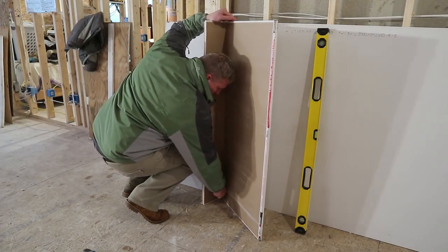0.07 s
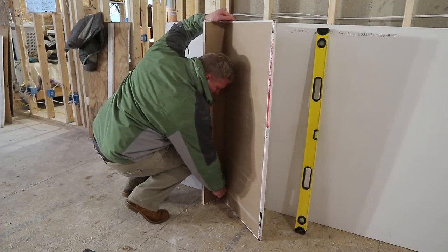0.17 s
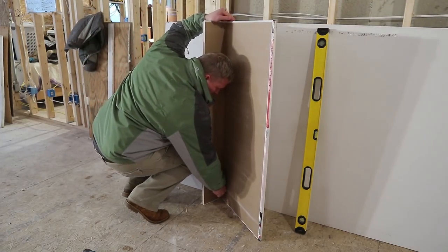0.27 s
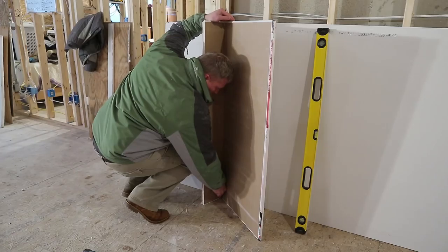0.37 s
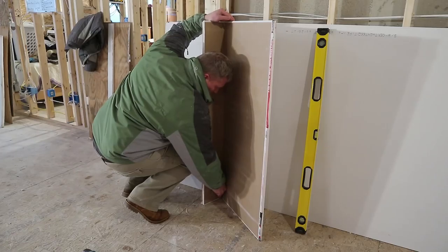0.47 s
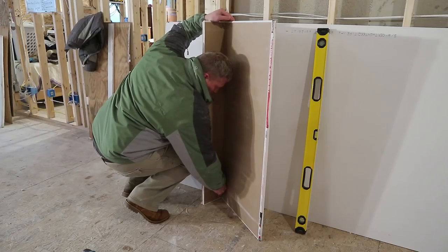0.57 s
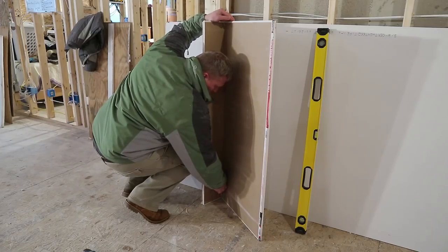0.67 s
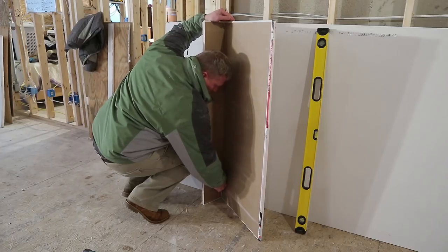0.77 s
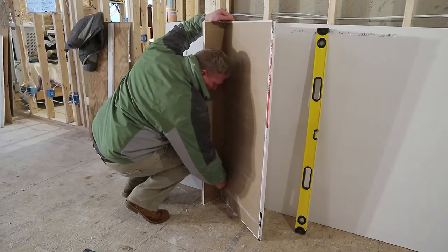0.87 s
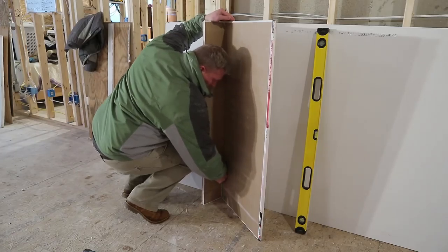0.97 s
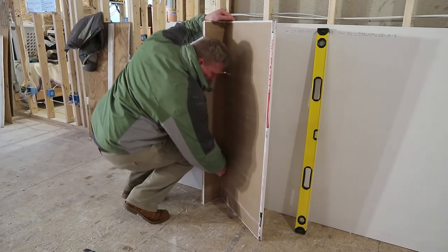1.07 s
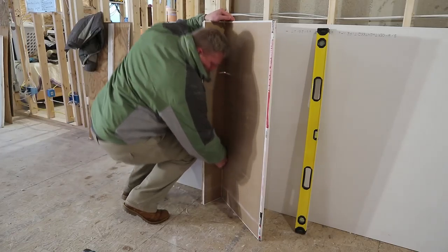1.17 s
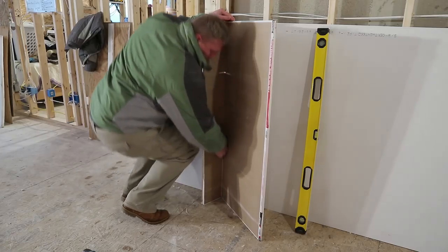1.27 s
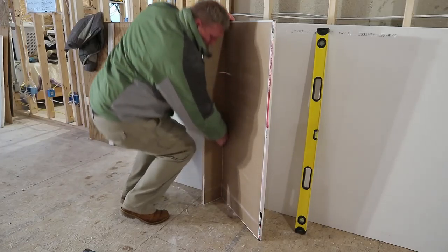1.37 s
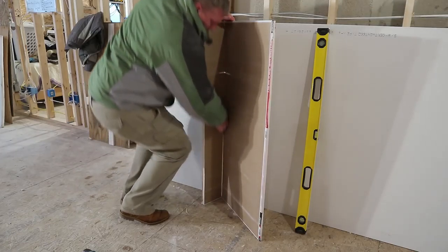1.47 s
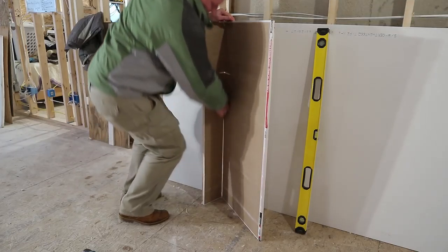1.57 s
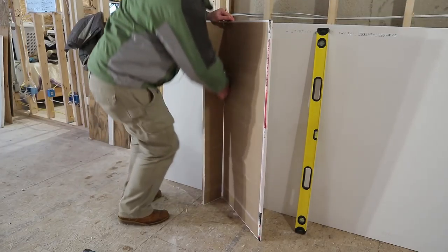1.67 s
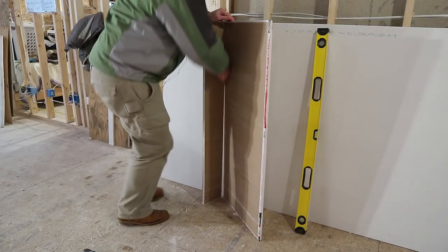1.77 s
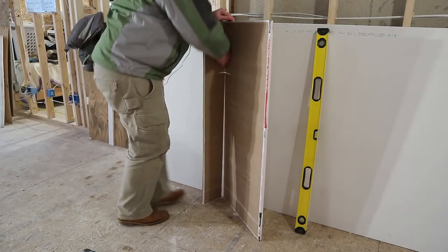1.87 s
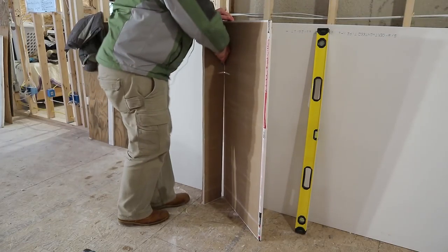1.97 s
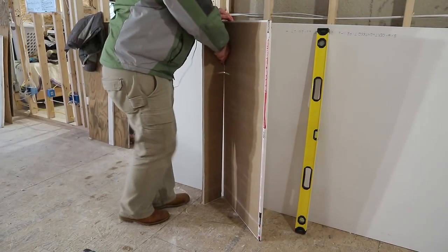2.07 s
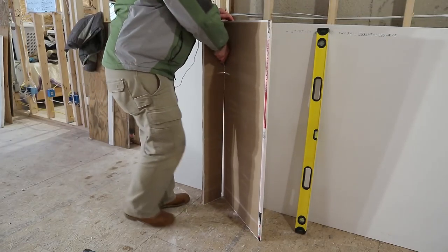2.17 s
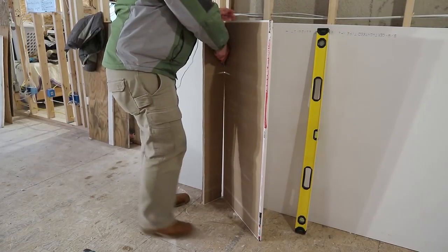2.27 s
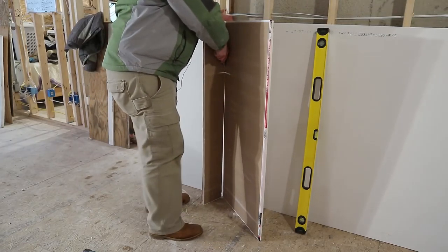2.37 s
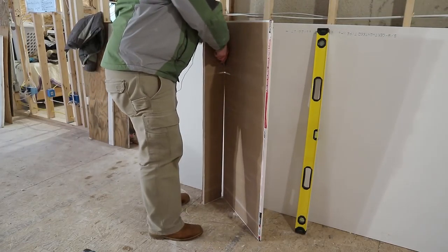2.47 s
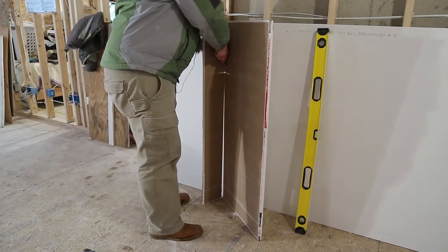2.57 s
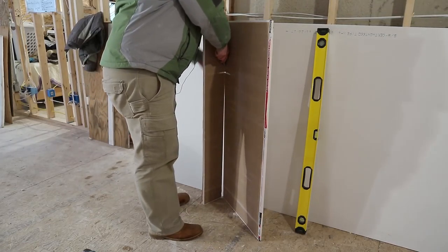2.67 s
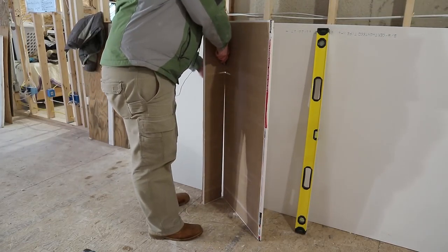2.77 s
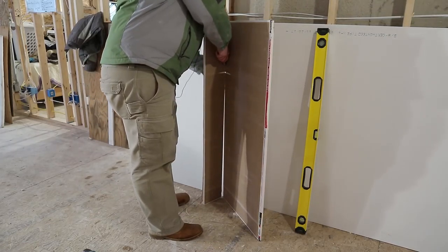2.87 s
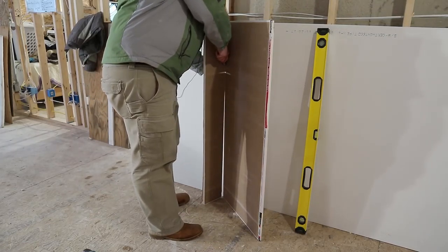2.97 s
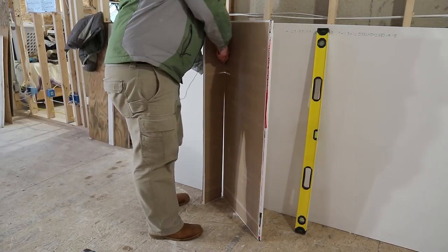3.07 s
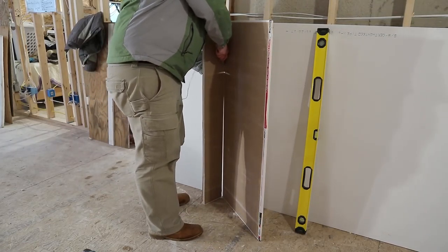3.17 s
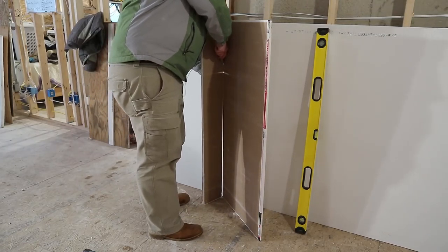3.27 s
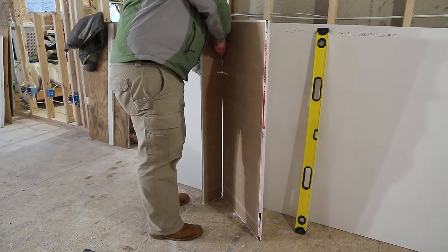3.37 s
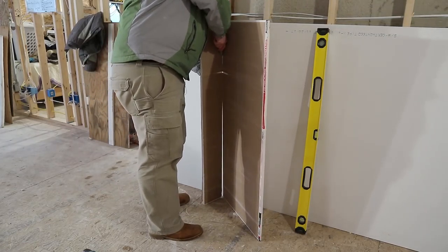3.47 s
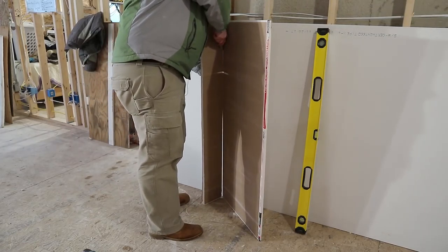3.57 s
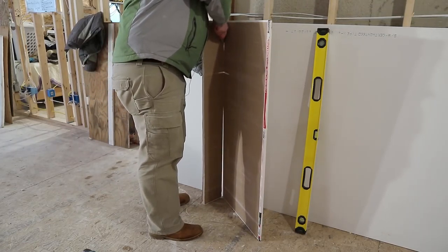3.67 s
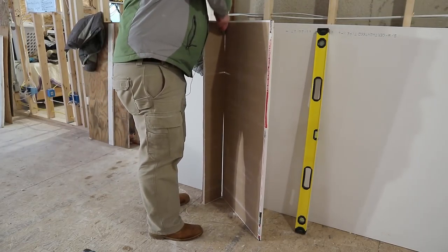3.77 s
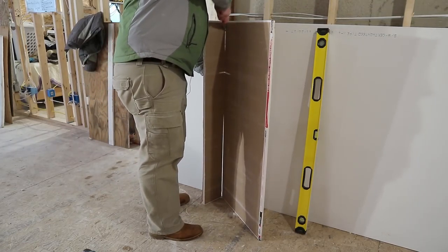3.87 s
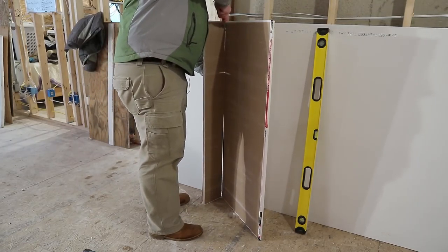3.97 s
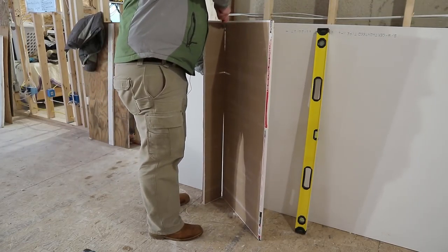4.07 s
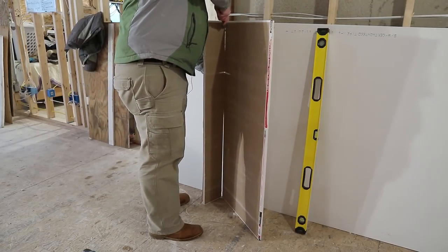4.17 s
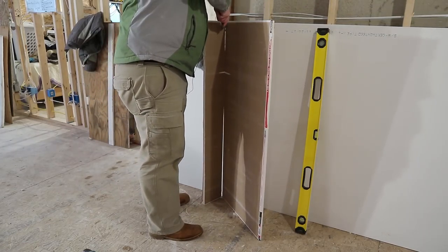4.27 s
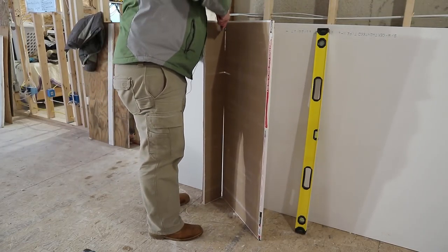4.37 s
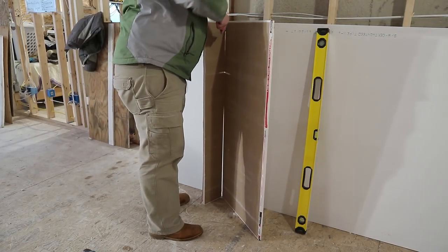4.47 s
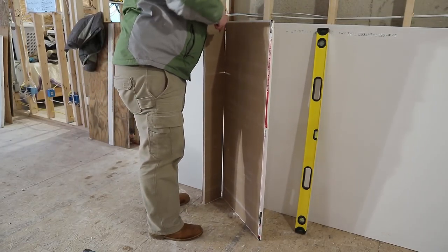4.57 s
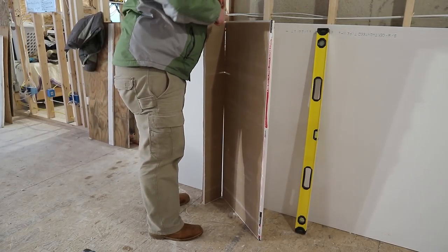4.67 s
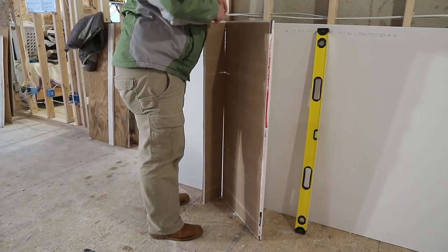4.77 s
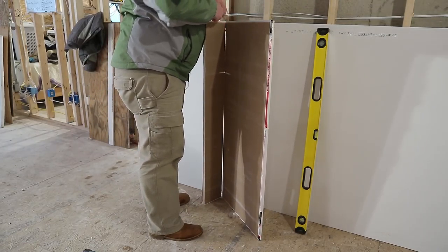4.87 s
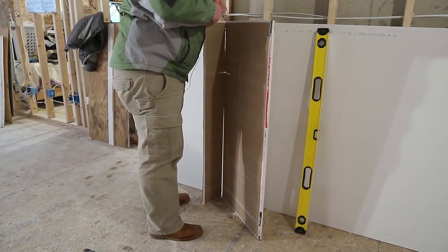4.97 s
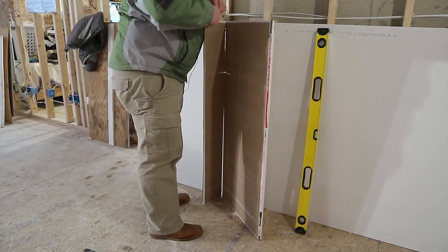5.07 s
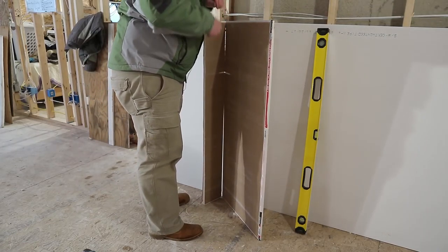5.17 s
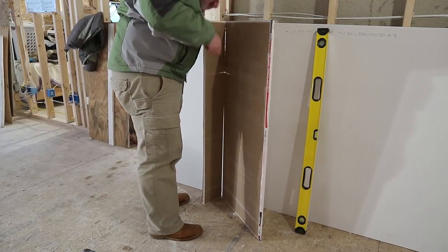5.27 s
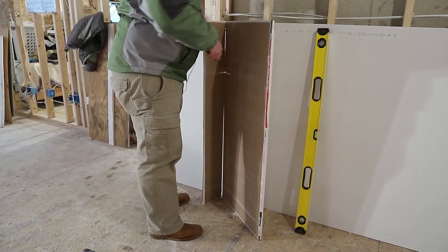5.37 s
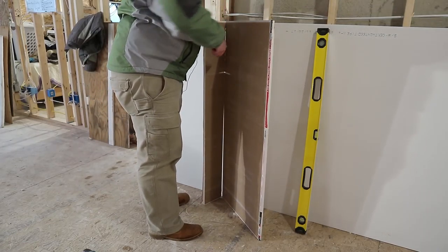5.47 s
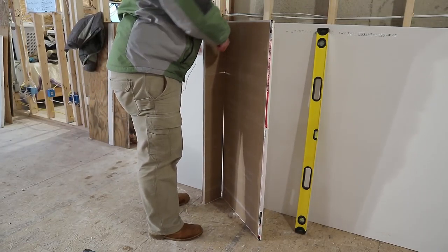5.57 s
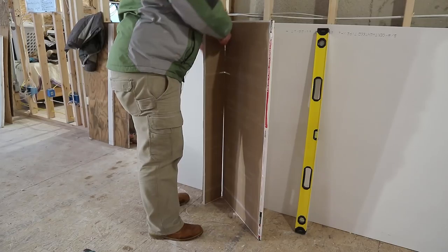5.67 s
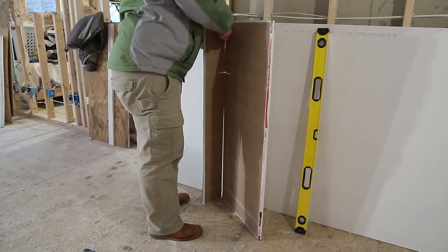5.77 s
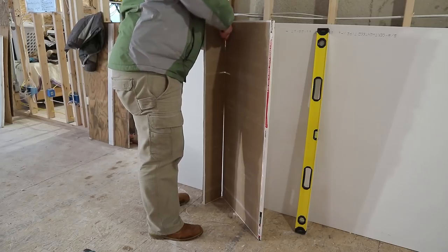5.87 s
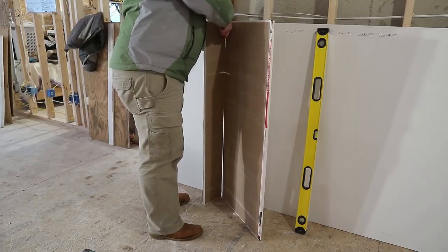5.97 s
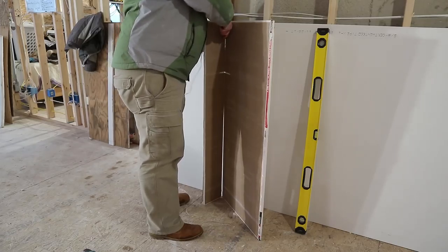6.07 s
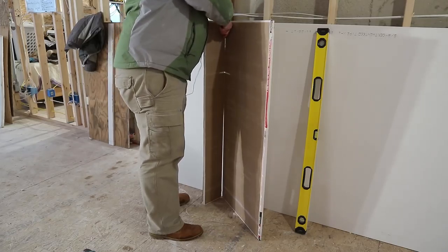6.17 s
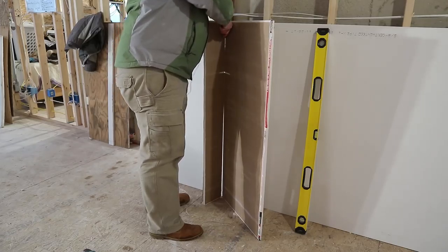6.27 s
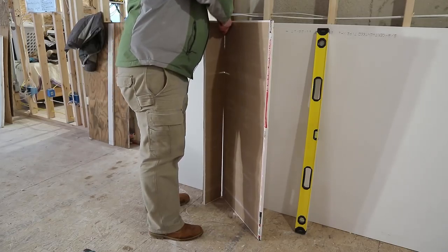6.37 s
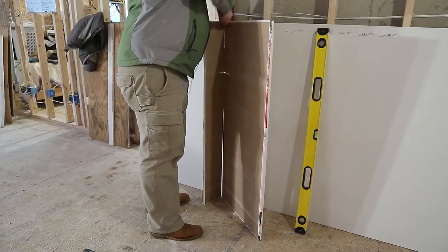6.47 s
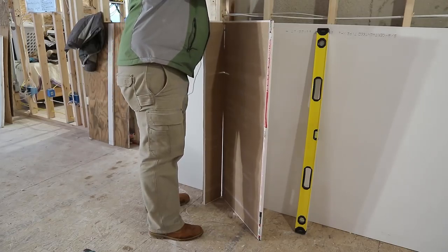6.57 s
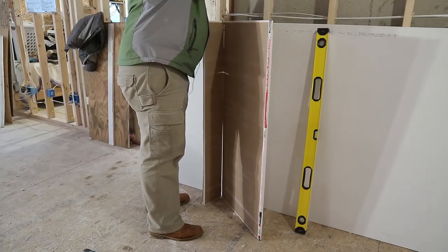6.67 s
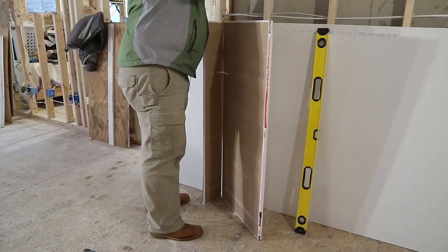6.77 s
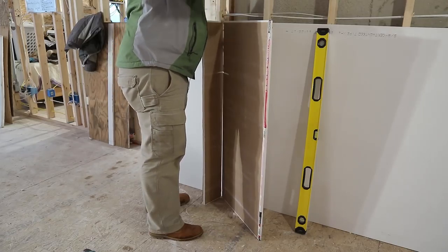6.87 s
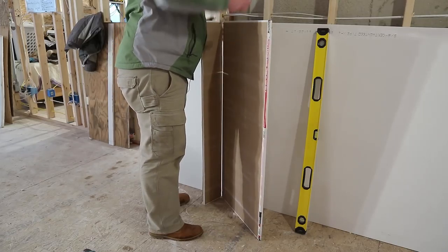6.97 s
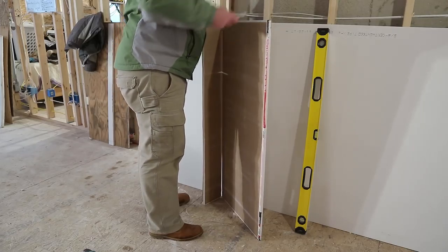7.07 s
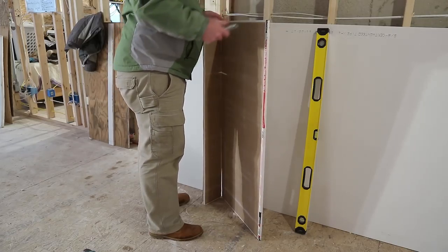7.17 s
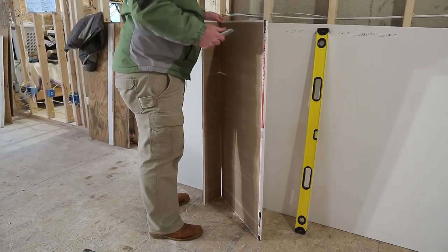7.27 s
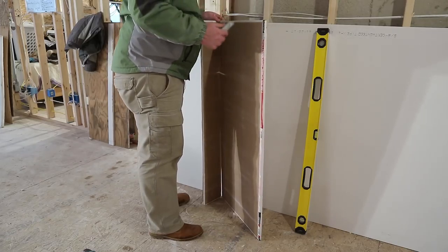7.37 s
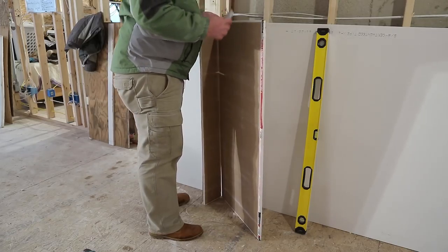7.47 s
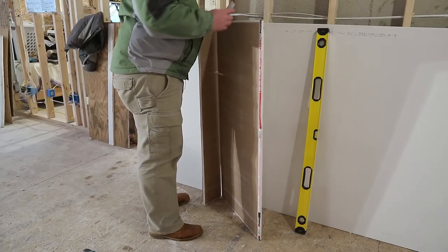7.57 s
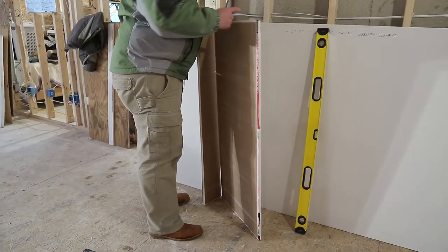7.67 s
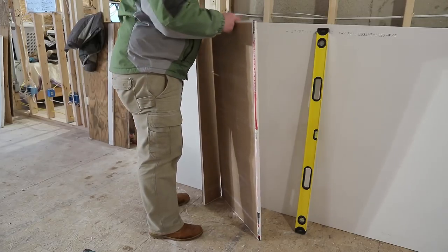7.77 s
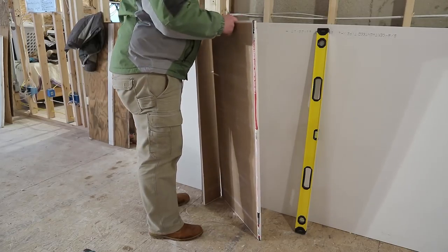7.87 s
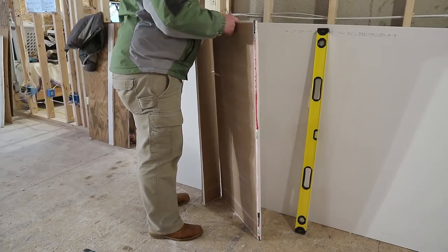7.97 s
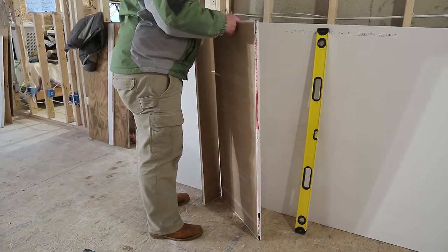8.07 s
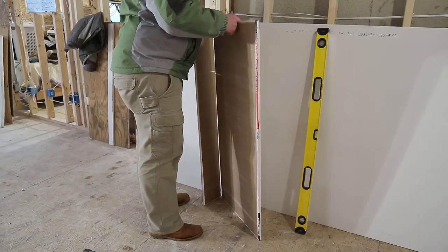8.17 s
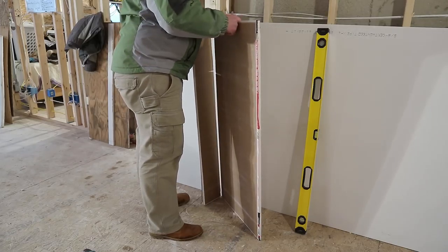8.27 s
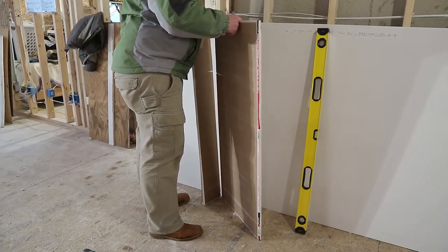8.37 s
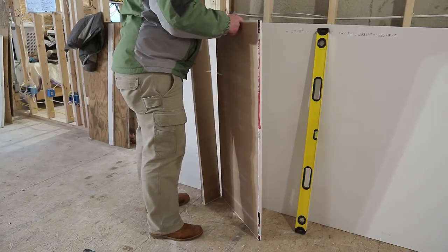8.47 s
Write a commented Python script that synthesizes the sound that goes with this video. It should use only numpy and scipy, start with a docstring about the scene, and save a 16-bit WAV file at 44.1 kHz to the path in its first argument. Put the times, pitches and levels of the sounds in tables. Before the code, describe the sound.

A sharp pop, then a knife rasps through the paper fold of a plasterboard sheet in three strokes, with shuffling, clicks and a final knock.

```python
"""Light shuffling and crackle come first; then a blade pops through the paper fold of a snapped gypsum board.
Three knife strokes follow: random fractures, filtered and scaled by blade speed, give rasp, bite, flex and fizz.
Noise bursts give snaps, prods, a step and bumps; swelling grain trains give the shuffling and jacket swish.
Bursts through metal resonances make the knife clink and its slider click; decaying modes ring the panel and
the cut piece that knocks on the floor. Sparse decaying taps give the bare room, over a steady quiet noise."""
import sys
import numpy as np
from scipy import signal
from scipy.io import wavfile
from scipy.ndimage import map_coordinates

SR = 44100
rng = np.random.default_rng(int(sys.argv[2]) if len(sys.argv) > 2 else 0)


def transcribe(u):
    """Save the signal u as a 16-bit wav file named by the first command-line argument.

    u: samples, shape (n,) or (channels, n), limited to [-1, 1]; the rate is SR.
    q: integer samples, one column per channel.
    """
    v = np.clip(np.atleast_2d(u).T, -1, 1)
    q = np.round(v * 32767).astype(np.int16)
    wavfile.write(sys.argv[1], SR, q)


N = 376173
TIME = np.arange(N) / SR
BINS = np.fft.rfftfreq(8192, 1 / SR)
LEAD_S = 0.05  # a burst peaks this long after its first sample

# Pulls of the blade. Each row: start in seconds, full speed reached in seconds, slowing begins in seconds,
# stop in seconds, exponent of the speeding-up (1 = even), easing before slowing in dB (scaled by each law),
# unevenness of the drag in dB (scales random curves), then levels at full speed, before the layer trims:
# rasp in dB, bite of the edge in dB, flexing of the board in dB, paper fizz in dB, sway of the sheet in dB.
STROKES = [(0.788, 1.633, 1.9, 1.97, 0.97, 1.5, 1.04, -21, -23.5, -35.5, -34, -54.5),
           (3.222, 3.527, 3.89, 4.06, 1.05, 8.4, 1.23, -30.5, -31, -43, -40.5, -53),
           (6.33, 6.509, 6.596, 6.794, 1.52, 12.3, 2.5, -26.5, -28, -43, -41.5, -54.5)]
# How each layer follows a pull: share that sounds even on a creeping blade, power of the blade's speed,
# share of the easing (a negative share grows along the pull).
RASP_LAW = (0.023, 0.95, 0.95)
BITE_LAW = (0.03, 1.16, 0.87)
FLEX_LAW = (0.06, 0.92, -0.37)
FIZZ_LAW = (0.27, 1.78, -0.2)
SWAY_LAW = (0.15, 0.7, -0.75)
# Spectra of the cut, normalised in use. Each row: frequency in Hz, relative density in dB per Hz.
RASP_SPECTRUM = [(250, -31), (400, -11), (510, -4.5), (640, 4), (900, -3), (1180, 1.5), (1600, 0),
                 (2000, -11), (3200, -42)]
BITE_SPECTRUM = [(1100, -31), (1850, -4), (2200, 2), (2650, -2.5), (3000, -4), (3350, -5), (3700, -12.5),
                 (4300, -13), (5500, -18.5), (8000, -31.5), (16000, -52.5)]
FLEX_SPECTRUM = [(60, -33), (130, -8), (190, -8.5), (260, -3.5), (335, 5.5), (400, 0.5), (470, -10),
                 (600, -30), (1500, -53)]
FIZZ_SPECTRUM = [(2000, -60.5), (4000, 4.5), (6200, 3), (8400, 6.5), (9800, -3.5), (13000, -4),
                 (16000, -12.5)]
SWAY_SPECTRUM = [(20, -41.5), (35, -17), (52, -1.5), (65, -2), (82, -2.5), (110, -7), (160, -12),
                 (400, -55)]
# Board resonances under the blade. Each row: frequency in Hz, width in Hz, relative level in dB.
BOARD_RESONANCES = [(739, 30, 4), (1140, 56, -0.5), (1630, 160, 1.5), (1900, 110, -4), (2310, 260, -4.5),
                    (2800, 200, -7.5), (3400, 280, -13), (4700, 950, -20)]
# Chatter on one resonance. Each row: middle in seconds, length in seconds, resonance in Hz,
# level in dB before the rasp trim.
CHATTERS = [(0.053, 0.094, 560, -45), (1.25, 0.81, 604, -33), (1.53, 0.76, 2530, -30),
            (1.73, 0.3, 2140, -30.5), (3.499, 0.33, 1196, -44), (3.72, 0.19, 2250, -40),
            (3.776, 0.29, 230, -41.5), (3.827, 0.39, 4240, -43), (6.152, 0.24, 757, -51),
            (6.506, 0.13, 1175, -37)]
# The released sheet wobbles. Each row: peak in seconds, level in dB, build-up in seconds, decay in seconds.
WOBBLES = [(0.6, -41, 0.015, 0.06), (1.93, -34.5, 0.015, 0.058), (4.0, -45, 0.038, 0.045),
           (4.14, -49.5, 0.026, 0.087)]
# Pops, catches and cracks. Each row: peak in seconds, level in dB, decay in seconds, treble edge in Hz.
SNAPS = [(0.028, -48.5, 0.007, 9000), (0.056, -40.5, 0.0045, 2150), (0.272, -49, 0.0058, 3000),
         (0.505, -43.5, 0.0075, 2500), (0.5683, -10, 0.0041, 3020), (0.5708, -16.5, 0.0014, 15000),
         (1.915, -25, 0.0067, 7900), (2.012, -30.5, 0.012, 4520), (2.227, -38.5, 0.0024, 12100),
         (2.943, -42, 0.011, 3000), (3.796, -30, 0.0076, 6000), (3.904, -25.5, 0.008, 13200),
         (3.985, -31.5, 0.0092, 13000), (5.995, -49, 0.0021, 15000), (6.029, -48, 0.0059, 13000),
         (6.508, -21, 0.0051, 2200), (6.603, -24.5, 0.011, 9950), (6.834, -42.5, 0.0062, 6100),
         (7.892, -40, 0.0049, 13000), (8.078, -49, 0.019, 11000), (8.118, -50, 0.014, 14900)]
# Spectrum of torn paper and grit. Each row: frequency in Hz, relative density in dB per Hz.
PAPER_SPECTRUM = [(25, -41), (100, -16), (500, -3), (1100, -4.5), (2500, -3.5), (3600, -3), (5000, -8.5),
                  (8400, -4.5), (10000, -13), (16000, -11.5)]
# Prods near the top of the fold. Each row: peak in seconds, level in dB, build-up in seconds.
PRODS = [(5.791, -36.5, 0.0012), (5.813, -50, 0.001), (5.927, -46, 0.001), (5.994, -42.5, 0.017),
         (6.078, -35.5, 0.0012), (6.174, -41, 0.008), (6.213, -36.5, 0.016)]
# Panel recoils as the blade enters and leaves. Each row: start in seconds, level in dB.
RECOILS = [(0.5712, -7.5), (1.9, -9.5), (1.907, -9.5)]
# The cut piece lands on its edge and rocks. Each row: start in seconds, level in dB.
LANDINGS = [(7.8915, -19), (7.9355, -33)]
# Modes of panel and piece. Each row: frequency in Hz, relative level in dB,
# time to fall 60 dB in seconds before division by the damping.
PANEL_MODES = [(284, -32.5, 0.025), (344, 4, 0.043), (423, 0, 0.044), (506, -2, 0.069), (578, -3, 0.043),
               (784, -10.5, 0.032)]
PIECE_MODES = [(234, -2, 0.089), (407, -11.5, 0.45), (530, -17.5, 0.63), (703.5, 4.5, 0.19),
               (802, -4, 0.27), (886, -9, 0.14), (952, -16, 0.2), (1160, -32, 0.24), (1180, -19, 0.42)]
# Notches of the blade slider. Each row: peak in seconds, level in dB before the slider gain.
NOTCHES = [(7.476, -22.5), (7.494, -26), (7.499, -28), (7.5125, -28), (7.5165, -25.5), (7.538, -41)]
# Knife clinks in the hand. Each row: peak in seconds, ring level in dB, tick level in dB.
CLINKS = [(6.702, -48, -47), (6.722, -38.5, -42), (6.9063, -30.5, -44), (7.002, -47, -64),
          (7.069, -49, -38.5), (7.101, -46, -42), (7.127, -58, -55)]
# Knife resonances. Each row: frequency in Hz, width in Hz, relative level in dB.
HANDLE_RESONANCES = [(960, 270, -12), (1760, 80, 5), (2070, 440, -4.5), (2800, 300, -9), (3340, 180, 2),
                     (3850, 350, -6), (4400, 500, -9), (5600, 570, -5.5), (6300, 400, -19), (8100, 690, -5),
                     (9300, 560, -18), (13200, 4100, -16.5)]
STEEL_RESONANCES = [(3960, 300, -1), (4130, 260, 2), (4230, 290, 0)]
TICK_RESONANCES = [(4280, 1400, 5), (5300, 600, -7), (6550, 600, 2), (8340, 640, 3.5), (9400, 640, -8),
                   (12800, 1700, -13)]
# A boot lands on the gritty floor. Each row: time of landing in seconds, level in dB.
STEPS = [(2.379, -30.5)]
# Hands, boots and board bump. Each row: peak in seconds, knock level in dB, thud level in dB,
# decay of the knock in seconds.
BUMPS = [(0.032, -53, -53.5, 0.018), (2.228, -33.5, -37.5, 0.0083), (2.602, -47.5, -60, 0.007),
         (2.791, -45, -60, 0.0022), (4.886, -50, -66.5, 0.0012), (7.003, -44.5, -49.5, 0.006),
         (7.227, -44, -45.5, 0.016), (7.811, -49, -41.5, 0.04)]
# Shifts of the body. Each row: middle in seconds, length in seconds, then levels before the movement trim:
# shuffling in dB, jacket swish in dB.
MOVES = [(0.03, 0.35, -50.5, -69), (0.263, 0.41, -55, -61.5), (0.483, 0.17, -43, -64),
         (2.21, 0.41, -48.5, -65), (2.563, 0.51, -54, -69), (2.92, 0.44, -52, -70),
         (3.13, 0.12, -48.5, -60), (4.133, 0.22, -54.5, -56.5), (4.312, 0.14, -57, -61),
         (4.52, 0.44, -55, -59.5), (5.334, 0.65, -60, -64.5), (5.648, 0.63, -57.5, -53),
         (6.21, 0.32, -58, -53.5), (6.346, 0.13, -71, -49), (6.776, 0.47, -54, -60),
         (7.134, 0.49, -53, -57.5), (7.465, 0.26, -49.5, -53.5), (7.717, 0.26, -54.5, -51),
         (7.868, 0.09, -42, -55), (8.22, 0.12, -58, -43.5), (8.35, 0.19, -67, -61),
         (8.483, 0.13, -49, -53.5)]
# Spectra of movement and of the still room. Each row: frequency in Hz, relative density in dB per Hz.
SHUFFLE_SPECTRUM = [(30, -4.5), (120, -3.5), (330, 0), (700, 0.5), (1200, -2), (2000, -6.5), (3500, -15.5),
                    (8000, -38.5)]
JACKET_SPECTRUM = [(500, -22), (1500, -3.5), (3000, 0.5), (5500, -0.5), (8400, -0.5), (10000, -9),
                   (13000, -10.5), (16000, -13.5)]
STILL_SPECTRUM = [(15, -52.5), (25, -7), (116, -11), (160, -20), (221, -7), (246, -6.5), (313, -4),
                  (410, -5.5), (871, -8), (2920, -18), (15500, -26.5)]
# Reverberation. Each row: frequency in Hz, time to fall 60 dB in seconds.
ROOM_DECAY = [(100, 0.82), (400, 0.42), (1040, 0.47), (2760, 0.47), (7280, 0.41), (15000, 0.3)]


def amp(db):
    """Level is logarithmic: 20 dB is a factor of ten in amplitude."""
    return 10 ** (np.asarray(db) / 20)


def cutting():
    """Friction and fracture: crushed gypsum and parting fibres excite a board that radiates, flexes and sways."""
    starts, *_, uneven_db, rasp_db, bite_db, flex_db, fizz_db, sway_db = np.transpose(STROKES)
    unevenness = np.interp(TIME, starts, uneven_db)
    drag = amp(unevenness * (0.97 * wander(rate_hz=45) + wander(rate_hz=220)))
    crumbs = grains(per_s=7000, spread_db=2.5) * drag
    board = evened(crumbs + 0.75 * travelling(crumbs, ring_s=0.0073, per_s=1.3))

    rasp = colour(board, shape(RASP_SPECTRUM)) * pulls(rasp_db, RASP_LAW) + chatter()
    bite = (colour(board, shape(BITE_SPECTRUM)) + snags()) * pulls(bite_db, BITE_LAW)
    flex_grains = grains(per_s=3000, spread_db=3.5) * drag
    flex = colour(flex_grains, shape(FLEX_SPECTRUM)) * pulls(flex_db, FLEX_LAW)
    fizz_grains = grains(per_s=14000, spread_db=1.5) * drag
    fizz = colour(fizz_grains, shape(FIZZ_SPECTRUM)) * pulls(fizz_db, FIZZ_LAW)
    sway_force = rng.standard_normal(N) * pulls(sway_db, SWAY_LAW) + bursts(WOBBLES)
    sway = colour(sway_force, shape(SWAY_SPECTRUM))

    body_of_cut = amp(-1) * rasp + amp(-2) * bite + amp(-3) * flex
    return room(body_of_cut, wet_db=-7) + room(amp(-3.14) * fizz, wet_db=-14) + sway


def pulls(peaks_db, law):
    """Radiation follows blade speed: it speeds up, eases along the fold, and slows to a stop."""
    creep, power, ease_share = law
    entry_s = 0.035  # the edge sinks into the paper, and leaves it
    out = np.zeros(N)
    for (start, full, slows, stop, curve, easing, *_), db in zip(STROKES, peaks_db):
        speeding_up = np.interp(TIME, [start, full], [0, 1]) ** curve
        speed = speeding_up * np.interp(TIME, [slows, stop], [1, 0])
        along = np.interp(TIME, [full, slows], [0, 1])
        touching = np.clip(np.minimum(TIME - start, stop - TIME) / entry_s, 0, 1)
        out += touching * (creep + (1 - creep) * speed ** power) * amp(db - ease_share * easing * along)
    return out


def travelling(x, ring_s, per_s):
    """Modal excitation: three dense sets of board modes are struck in proportions that turn at a fixed rate."""
    t, out = np.arange(SR // 20) / SR, np.zeros(N)
    for k in range(3):
        ring = rng.choice([-1., 1.], len(t)) * np.exp(-t / ring_s)
        nearness = np.maximum(np.cos(2 * np.pi * (per_s * TIME + k / 3)), 0)
        out += signal.oaconvolve(x * nearness, ring / np.linalg.norm(ring))[:N]
    return out


def snags():
    """Impulsive excitation: lumps of gypsum crack under the edge and ring the board."""
    gain = resonances(BOARD_RESONANCES) * band(low_hz=400, high_hz=3600) / 2
    return amp(-12) * colour(grains(per_s=70, spread_db=2.5), gain)


def chatter():
    """Selective resonance: scraping noise swells on one resonance and leaves it again."""
    scrape = rng.standard_normal(N)
    out = np.zeros(N)
    for middle, length, hz, db in CHATTERS:
        tone = resonate(resonate(scrape, hz, width=170), hz, width=200)
        out += amp(db) * swell(middle, length) * evened(tone)
    return out


def snaps():
    """Sudden fracture: tearing paper swells into a snap; the studs scatter it before it fills the room."""
    direct, scattered = np.zeros(N), np.zeros(N)
    paper, scatter_s = shape(PAPER_SPECTRUM), 0.014
    for s, db, decay, edge_hz in SNAPS:
        rise = min(0.7 * decay, 0.0066)  # build-up is a share of the decay, up to a limit in seconds
        gain = amp(db) * evened(paper / np.sqrt(1 + (BINS / edge_hz) ** 4))
        thinning = np.sqrt((rise + decay) / (rise + decay + scatter_s))  # the same energy over a longer time
        add(direct, s - LEAD_S, colour(burst(rise, decay), gain))
        add(scattered, s - LEAD_S, thinning * colour(burst(rise, decay + scatter_s), gain))
    return direct + amp(-10) * tail(scattered)


def prods():
    """Forced vibration: stabs of the blade tip ring the stiff strip of board and nudge the sheet."""
    stabs = bursts([(s, db, rise, 0.012) for s, db, rise in PRODS])
    nudge = shake(PRODS, db=-11.5, decay_s=0.046, low_hz=100, high_hz=416)
    return room(colour(stabs, resonances(BOARD_RESONANCES)) + nudge, wet_db=-7)


def resonant_knocks():
    """Free vibration: the recoiling panel and the landing piece ring with their clear modes."""
    panel = room(ringing(RECOILS, PANEL_MODES, contact=0.0013, damping=1.15), wet_db=-11.5)
    piece = room(ringing(LANDINGS, PIECE_MODES, contact=0.001, damping=1.23), wet_db=-9)
    open_sheet = signal.butter(2, 130, "high", fs=SR, output="sos")  # an open sheet radiates little bass
    return signal.sosfilt(open_sheet, panel + piece)


def ringing(blows, modes, contact, damping):
    """Modal superposition: each blow starts the same decaying sines; a long contact softens the start."""
    t, out = np.arange(SR // 2) / SR, np.zeros(N)
    ring = sum(amp(db - 60 * damping * t / t60) * np.sin(2 * np.pi * hz * t) for hz, db, t60 in modes)
    for s, db in blows:
        add(out, s, amp(db) * ring * (1 - np.exp(-t / contact)))
    return out


def body():
    """High modal density: under their clear modes, panel and piece give a dense crack and a longer rumble."""
    panel_crack = shake(RECOILS, db=-10, decay_s=0.005, low_hz=290, high_hz=950)
    panel_rumble = shake(RECOILS, db=-15.5, decay_s=0.032, low_hz=237, high_hz=597)
    piece_crack = shake(LANDINGS, db=-2, decay_s=0.0067, low_hz=248, high_hz=1620)
    piece_rumble = shake(LANDINGS, db=-11.5, decay_s=0.029, low_hz=185, high_hz=330)
    floor = shake(LANDINGS, db=-25, decay_s=0.054, low_hz=62, high_hz=115)
    return room(panel_crack + panel_rumble + piece_crack + piece_rumble + floor, wet_db=-3)


def slider():
    """Impact: the blade slider drops into its notches and rings the handle."""
    clicks = knife(NOTCHES, HANDLE_RESONANCES, contact=0.0047, echo_s=0.0045, echo_db=-24)
    return room(amp(2.5) * clicks, wet_db=-5)


def clinks():
    """Impact: the knife clinks in the hand as a narrow steel ring and a brighter, broader tick."""
    ring_blows = [(s, db) for s, db, _ in CLINKS]
    tick_blows = [(s, db) for s, _, db in CLINKS]
    ring = knife(ring_blows, STEEL_RESONANCES, contact=0.0046, echo_s=0.0031, echo_db=-9)
    tick = knife(tick_blows, TICK_RESONANCES, contact=0.0045, echo_s=0.0059, echo_db=-7)
    return room(ring + tick, wet_db=-2)


def knife(clicks, modes, contact, echo_s, echo_db):
    """Resonance and reflection: metal chatters into its resonances; the board close by throws it back."""
    direct = colour(bursts([(s, db, 0.0001, contact) for s, db in clicks]), resonances(modes))
    return direct + amp(echo_db) * np.interp(TIME - echo_s, TIME, direct)


def steps():
    """Load transfer: heel knocks, sole scuffs on grit, floor booms, then bounces as the weight arrives."""
    heel_force = bursts([(s, db - 4, 0.004, 0.031) for s, db in STEPS])
    heel = colour(heel_force, band(low_hz=113, high_hz=989))
    scuff_force = bursts([(s, db - 8.5, 0.006, 0.065) for s, db in STEPS])
    scuff = colour(scuff_force, evened(shape(PAPER_SPECTRUM) * band(low_hz=100, high_hz=5530)))
    delayed = [(s + 0.018, db) for s, db in STEPS]
    boom = shake(delayed, db=-0.5, decay_s=0.016, low_hz=111, high_hz=222)
    weight = bursts([(s + 0.11, db - 18, 0.08, 0.07) for s, db in STEPS])
    bounce = colour(weight, band(low_hz=33, high_hz=60))
    return room(heel + boom, wet_db=-4) + room(scuff, wet_db=-20) + bounce


def bumps():
    """Soft contact: crowded modes of board and floor give a short knock over a longer thud."""
    thud_lingers_s = 0.012  # added to the decay of the knock
    knock = bursts([(s, db, 0.001, decay) for s, db, _, decay in BUMPS])
    thud = bursts([(s, db, 0.0015, decay + thud_lingers_s) for s, _, db, decay in BUMPS])
    knock = colour(knock, band(low_hz=520, high_hz=1713))
    thud = colour(thud, band(low_hz=190, high_hz=420))
    return room(knock + thud, wet_db=-2.5)


def movement():
    """Granular friction: boots and hands shuffle on grit, crumbs tick, and the nylon jacket swishes."""
    shuffling, swishing = amp(-65.5), amp(-74)  # what is left between the shifts, before the trim
    for middle, length, shuffle_db, swish_db in MOVES:
        shuffling = shuffling + amp(shuffle_db) * swell(middle, length)
        swishing = swishing + amp(swish_db) * swell(middle, length)
    shuffle = colour(grains(per_s=1500, spread_db=2.5), shape(SHUFFLE_SPECTRUM)) * amp(1.8 * wander(rate_hz=43))
    swish = colour(grains(per_s=9000, spread_db=3.5), shape(JACKET_SPECTRUM)) * amp(1.2 * wander(rate_hz=35))
    crumbs = colour(grains(per_s=27, spread_db=2), shape(PAPER_SPECTRUM))
    trimmed = amp(-6) * (shuffle * shuffling + swish * swishing)
    return room(trimmed + amp(-18) * crumbs * shuffling, wet_db=-5)


def still_room():
    """Stationary noise: the quiet room is steady random pressure with a fixed spectrum."""
    return amp(-62.5) * colour(rng.standard_normal(N), shape(STILL_SPECTRUM))


def room(x, wet_db):
    """Superposition: direct sound plus the room's tail."""
    return x + amp(wet_db) * tail(x)


def tail(x):
    """Reverberation: sparse random reflections, each frequency dying at its own speed."""
    taps = rng.choice([-1., 1.], SR) * (rng.random(SR) < 4000 / SR)
    taps[:SR // 200] = 0  # no reflection in the first 5 ms
    hz, t, z = signal.stft(taps, SR, nperseg=256)
    decay = amp(-60 * t / read(ROOM_DECAY, hz)[:, None])
    response = signal.istft(z * decay, SR, nperseg=256)[1]
    return signal.oaconvolve(x, response / np.linalg.norm(response))[:N]


def shake(blows, db, decay_s, low_hz, high_hz):
    """Band excitation: every blow (start, dB, ..) shakes the same band of crowded modes."""
    force = bursts([(s, force_db, 0.0012, decay_s) for s, force_db, *_ in blows])
    return amp(db) * colour(force, band(low_hz, high_hz))


def bursts(rows):
    """Superposition: one burst for each row of (peak s, dB, build-up s, decay s)."""
    out = np.zeros(N)
    for s, db, rise, decay in rows:
        add(out, s - LEAD_S, amp(db) * burst(rise, decay))
    return out


def burst(rise, decay):
    """Transient excitation: noise swells exponentially to its peak after LEAD_S and dies away."""
    t = np.arange(SR // 2) / SR - LEAD_S
    return np.exp(np.minimum(t / rise, -t / decay)) * rng.choice([-1., 1.], len(t))


def grains(per_s, spread_db):
    """Random point process: a train of tiny fractures, a few of them large."""
    size = amp(spread_db * np.minimum(rng.exponential(1, N), 4)) * rng.choice([-1, 1], N)
    return evened(size * (rng.random(N) < per_s / SR))


def wander(rate_hz):
    """Slow random modulation: straight lines join chance values, rate_hz of them a second."""
    knots = evened(rng.standard_normal(N // 20))
    return map_coordinates(knots, [TIME * rate_hz], order=1, mode="mirror")


def swell(middle, length):
    """Amplitude envelope: one smooth arch of gain."""
    return np.cos(np.pi * np.clip((TIME - middle) / length, -.5, .5))


def colour(x, gain):
    """Minimum-phase filtering: a causal filter of the given gain rings only after each click."""
    log_gain = np.log(np.maximum(np.r_[gain, gain[-2:0:-1]], 1e-5))
    taps = np.fft.ifft(np.exp(np.conj(signal.hilbert(log_gain)))).real
    return signal.oaconvolve(x, taps[:len(gain)])[:len(x)]


def resonate(x, hz, width):
    """Single resonance: one complex pole whose bandwidth sets its decay."""
    r = np.exp(-np.pi * width / SR)
    return signal.lfilter([1 - r], [1, -r * np.exp(2j * np.pi * hz / SR)], x).real


def resonances(modes):
    """Resonance curves: summed power of a bank of modes at every bin, with unit power."""
    power = np.zeros(len(BINS))
    for hz, width, db in modes:
        detuning = (BINS ** 2 - hz ** 2) / (width * BINS + 1)
        power += amp(2 * db) / (1 + detuning ** 2)
    return evened(np.sqrt(power))


def band(low_hz, high_hz):
    """Crowded modes: they merge into one smooth band of gain, with unit power."""
    low_side = 1 + (low_hz / (BINS + 1)) ** 8
    high_side = 1 + (BINS / high_hz) ** 6
    return evened(1 / np.sqrt(low_side * high_side))


def shape(points):
    """Spectral envelope: gain of a spectrum table at every bin, with unit power."""
    return evened(amp(read(points, BINS)))


def read(points, hz):
    """Logarithmic pitch scale: a table of (Hz, value) is joined on a log-frequency axis."""
    f, value = np.transpose(points)
    return np.interp(np.log(hz + 1), np.log(f), value)


def evened(x):
    """Normalisation: scale to unit mean power."""
    return x / np.sqrt(np.mean(x ** 2) + 1e-20)


def add(mix, s, sound):
    """Superposition: add a sound at a time in seconds, cropped to the mix."""
    start = round(s * SR)
    part = mix[max(start, 0):][:len(sound) + min(start, 0)]
    sound = sound[max(-start, 0):]
    part += sound[:len(part)]


def scene():
    """Linear superposition of all sources, from the cut to the still room."""
    board = cutting() + snaps() + prods() + resonant_knocks() + body()
    tool = slider() + clinks()
    person = steps() + bumps() + movement()
    return board + tool + person + still_room()


def record(dry):
    """Band limiting: a linear-phase low-pass removes the extreme treble."""
    edge_hz = 15850
    taps = signal.firwin(511, edge_hz, window=("kaiser", 9), fs=SR)
    return signal.oaconvolve(dry, taps, "same")[None]


dry = scene()
out = record(dry)
transcribe(out)
```